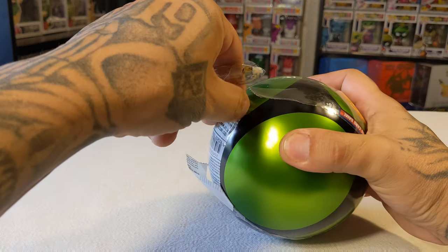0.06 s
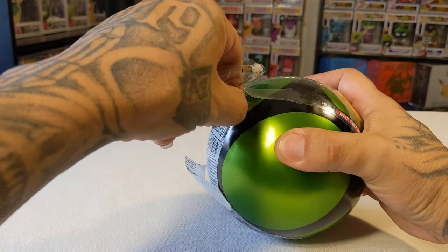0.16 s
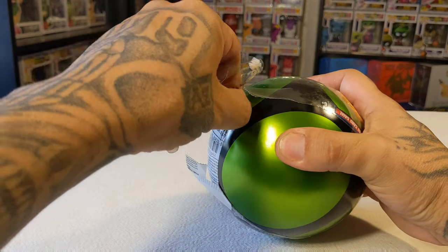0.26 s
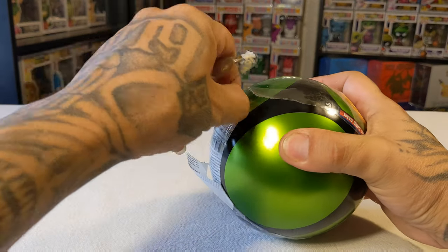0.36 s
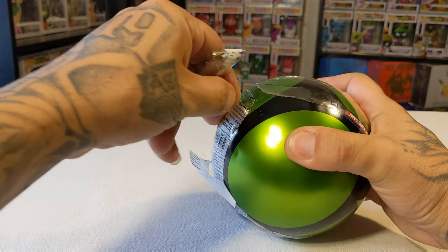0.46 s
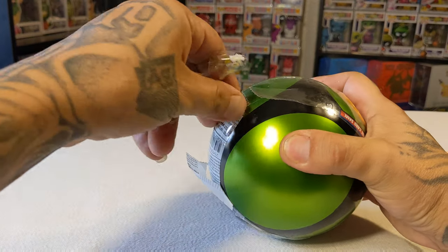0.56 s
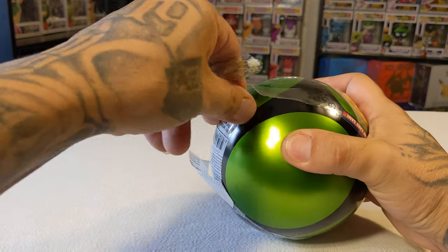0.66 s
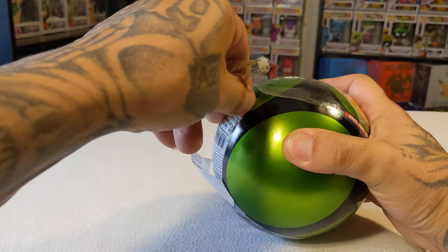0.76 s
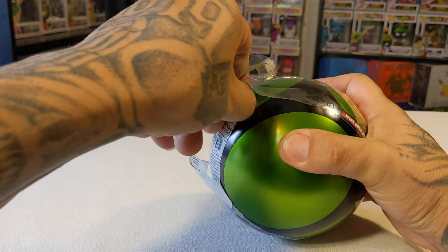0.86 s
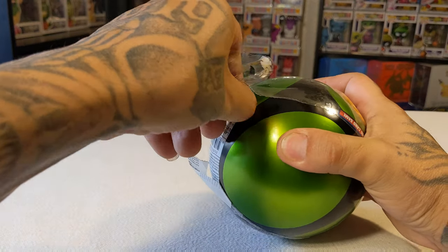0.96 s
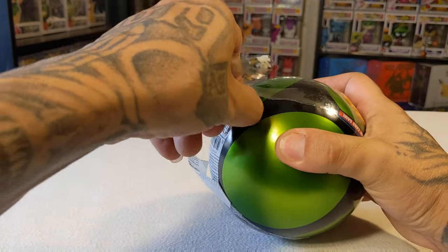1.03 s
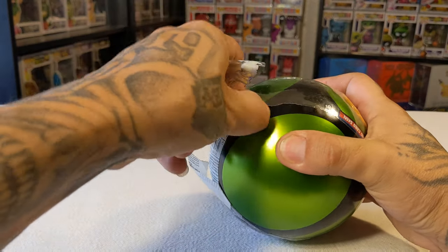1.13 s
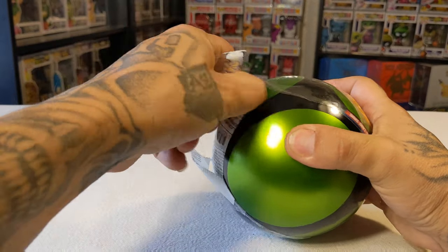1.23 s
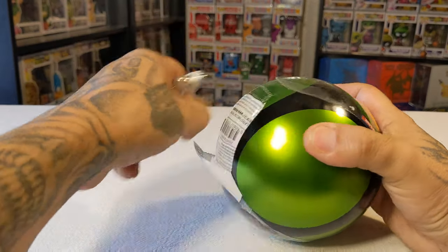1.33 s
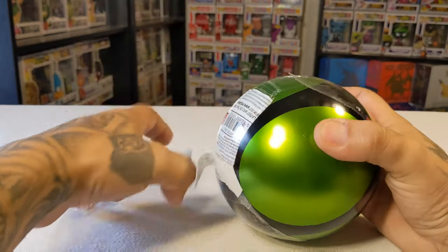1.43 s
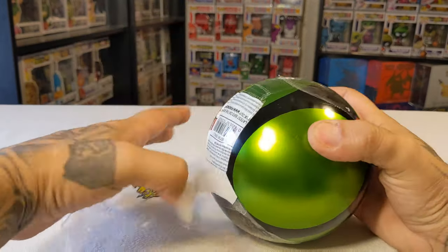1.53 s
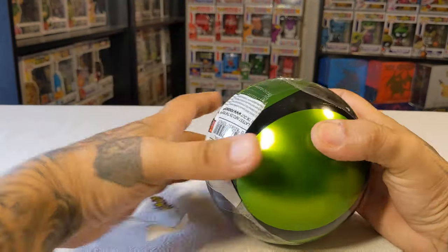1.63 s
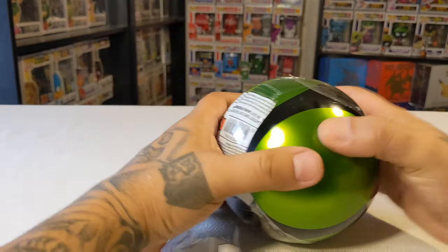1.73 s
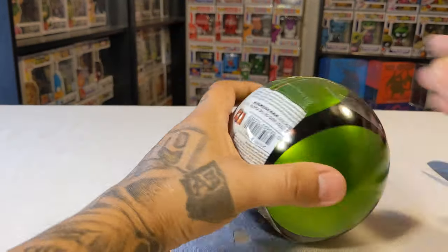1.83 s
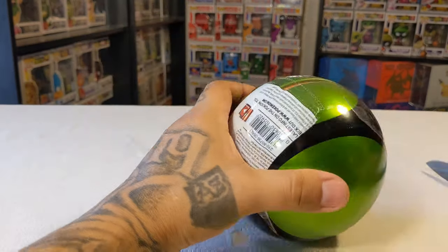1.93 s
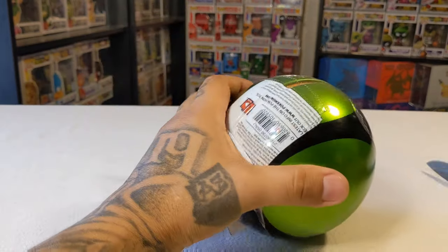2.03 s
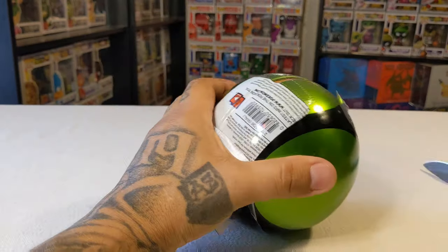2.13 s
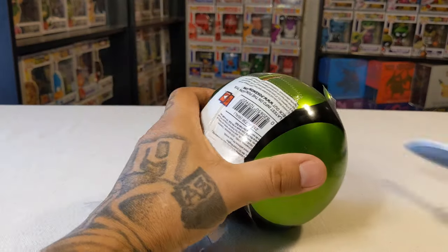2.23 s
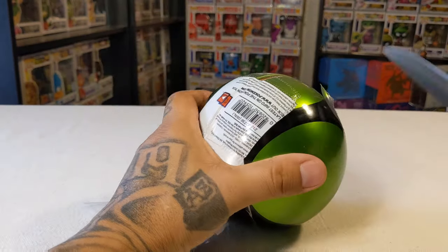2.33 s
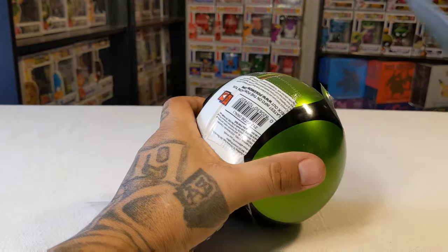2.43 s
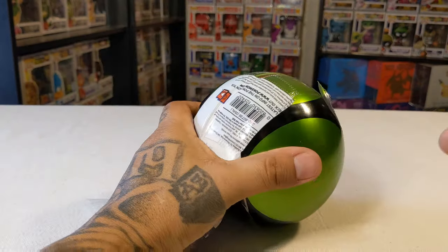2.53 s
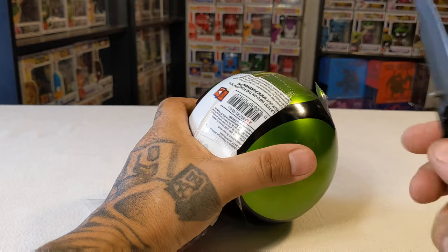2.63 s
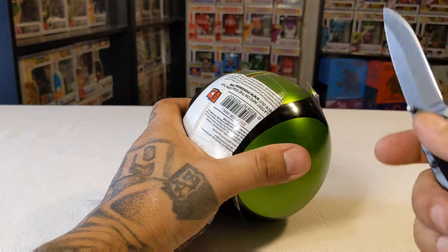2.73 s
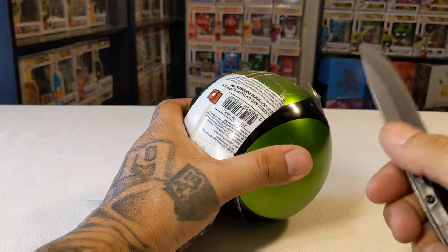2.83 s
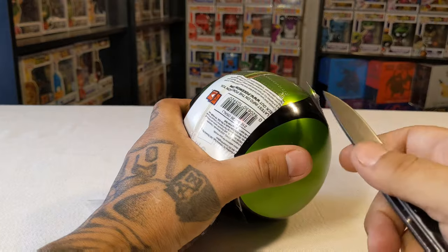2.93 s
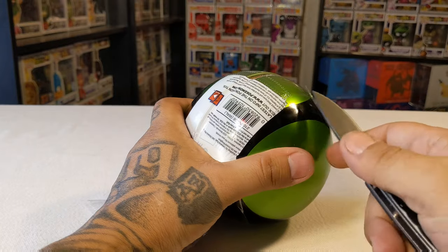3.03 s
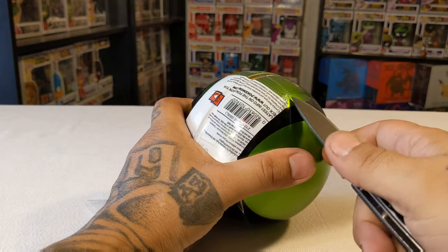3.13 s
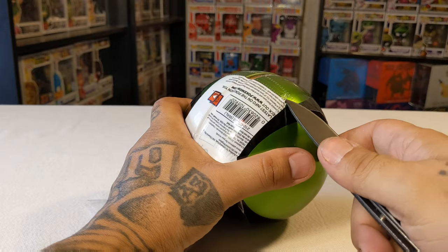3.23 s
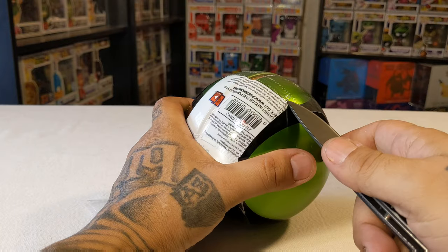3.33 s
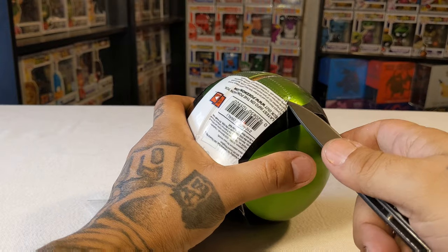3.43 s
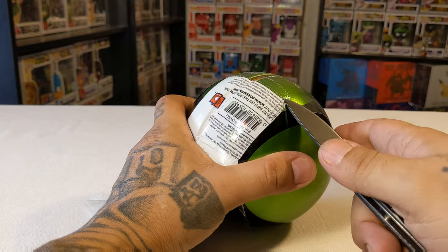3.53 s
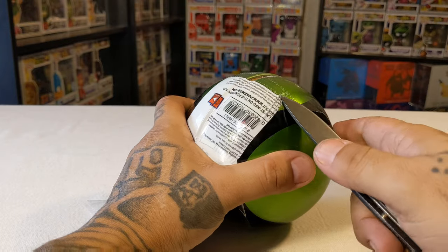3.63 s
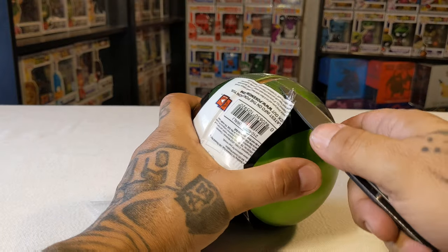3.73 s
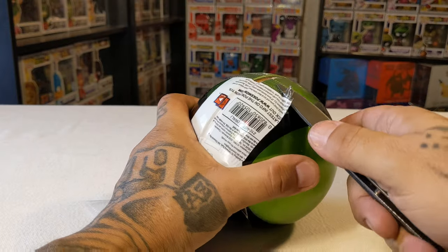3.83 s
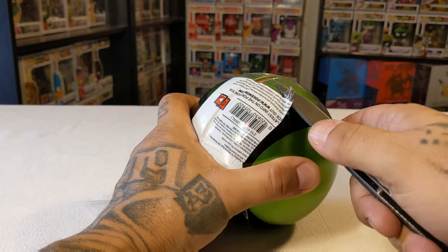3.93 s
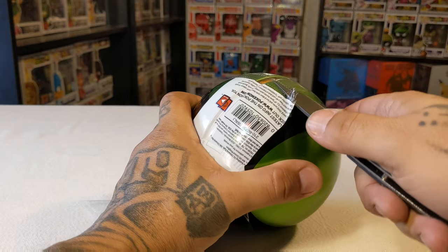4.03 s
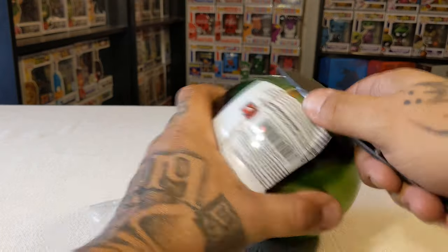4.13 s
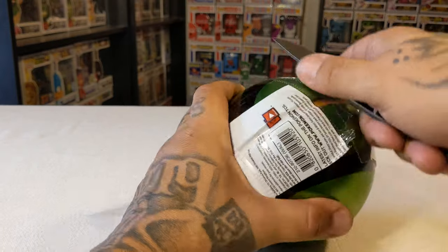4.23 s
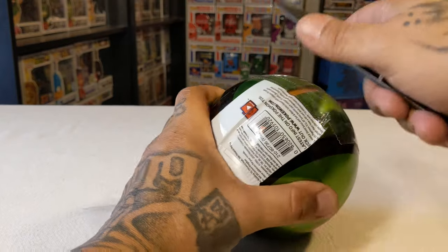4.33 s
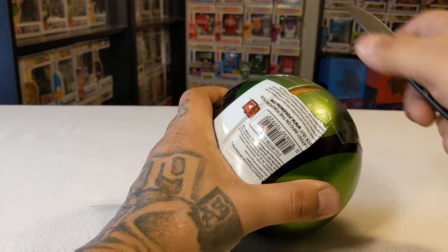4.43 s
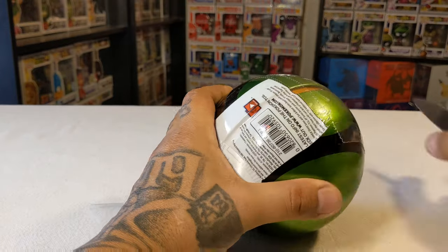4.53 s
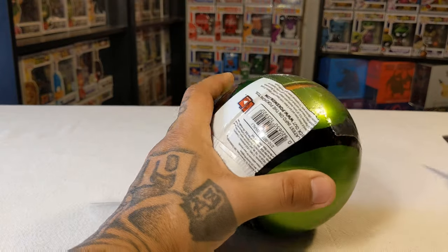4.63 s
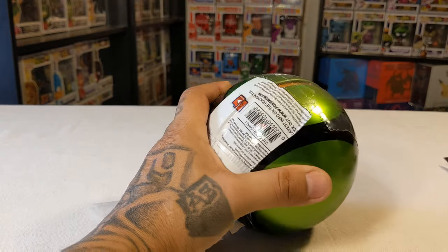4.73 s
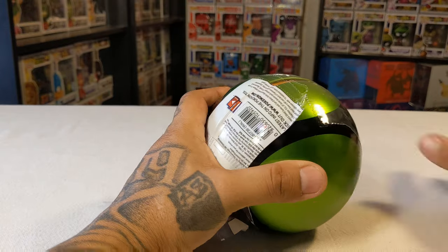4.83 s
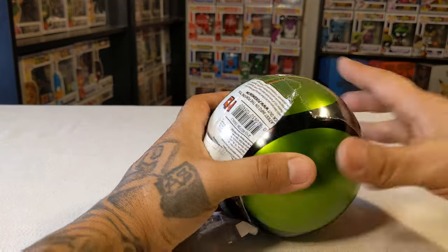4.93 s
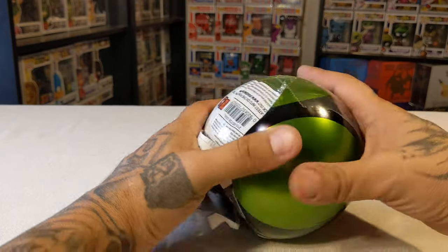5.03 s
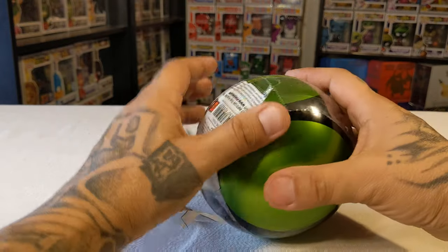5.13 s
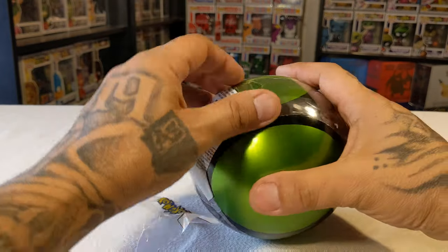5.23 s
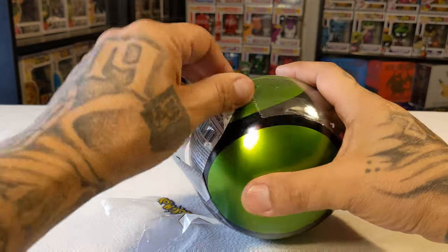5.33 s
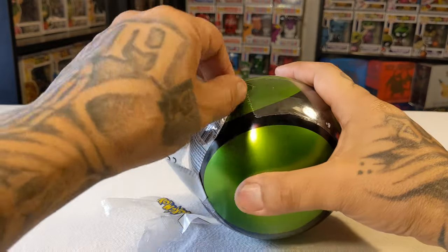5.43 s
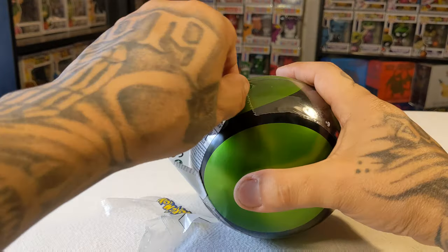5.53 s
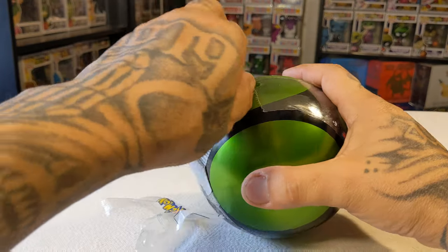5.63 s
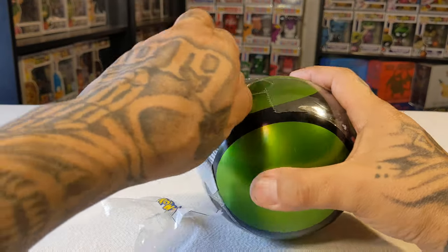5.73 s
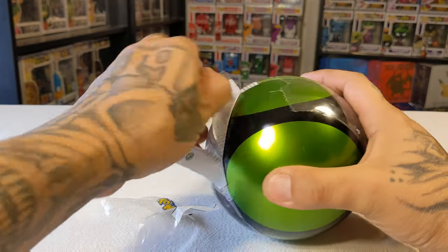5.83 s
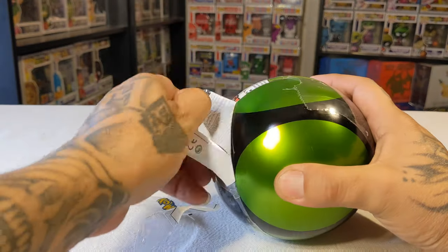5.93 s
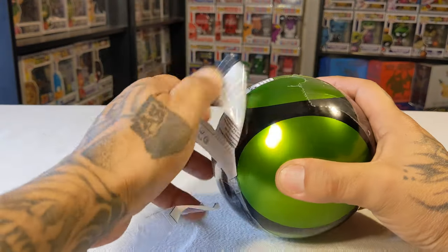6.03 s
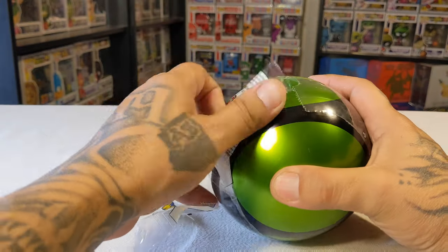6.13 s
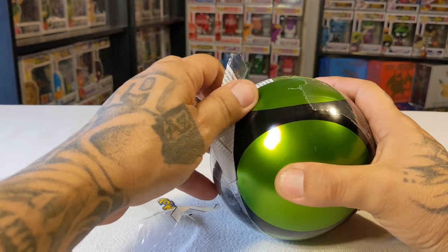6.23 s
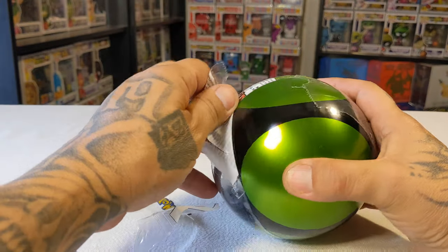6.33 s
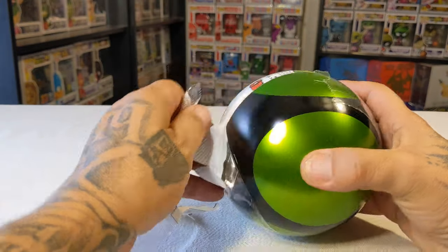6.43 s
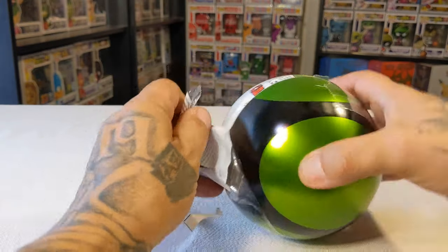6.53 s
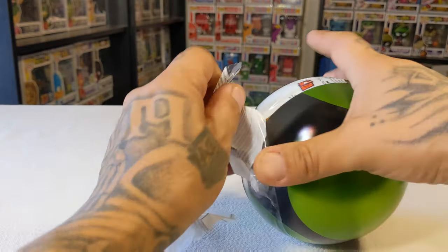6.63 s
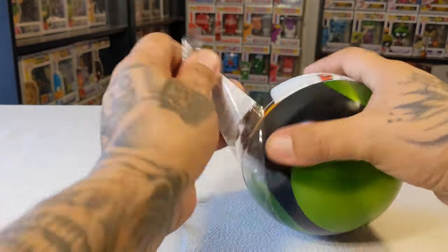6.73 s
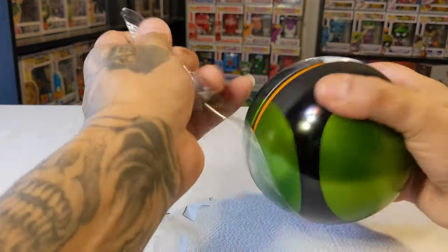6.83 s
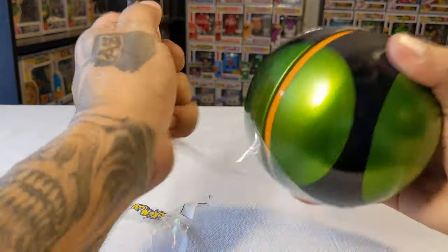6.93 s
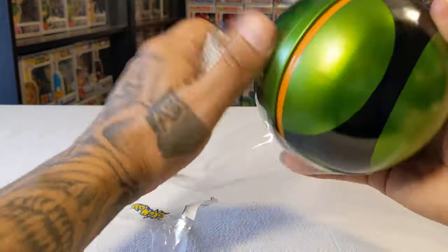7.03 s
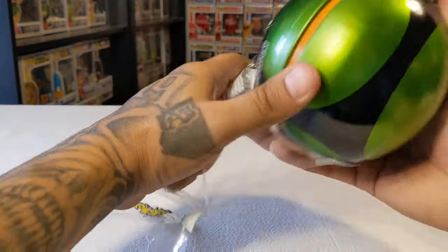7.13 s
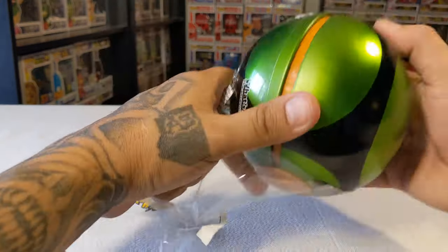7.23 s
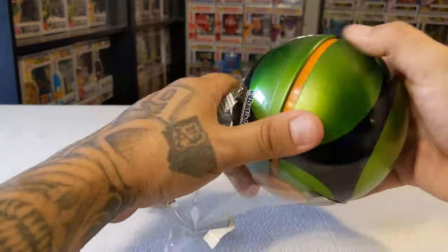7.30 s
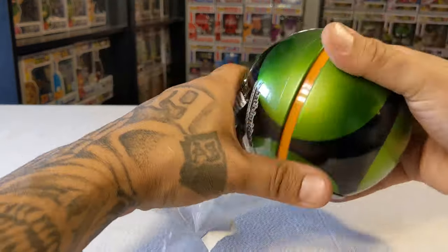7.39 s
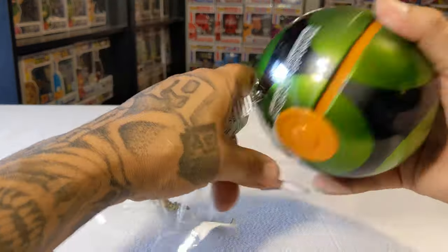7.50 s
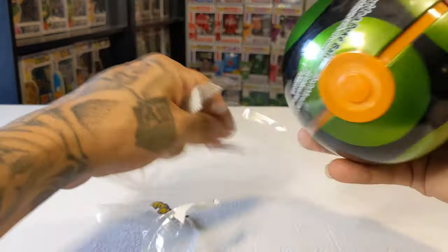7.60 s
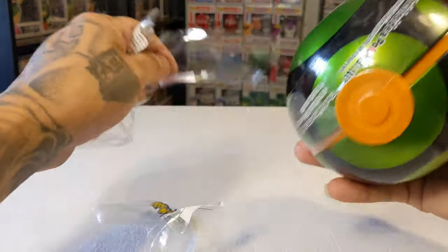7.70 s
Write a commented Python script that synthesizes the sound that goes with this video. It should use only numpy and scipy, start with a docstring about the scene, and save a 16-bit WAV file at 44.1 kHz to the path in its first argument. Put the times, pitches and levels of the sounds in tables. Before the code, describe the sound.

Plastic shrink-wrap crackles and snaps as it is peeled off a round metal tin, pausing midway, then torn away in loud bursts, with table thuds.

```python
"""Shrink-wrap torn off a tin

Hands tear and peel shrink-wrap off a round metal tin on a table in a small room, close to two unlike microphones.
Creases of film snap as shaped noise bursts over crinkle and rustle made of tiny grains; midway a knife nicks
the film, heard through the same snaps. Decaying modes make the tin's bumps on the table and its shell's rattles.
Room reflections, low rumble, hiss and one brief thin tone lie around it."""
import sys
import numpy as np
from scipy import signal
from scipy.fft import rfft, irfft, next_fast_len
from scipy.io import wavfile
from scipy.ndimage import uniform_filter1d

SR = 44100
rng = np.random.default_rng(int(sys.argv[2]) if len(sys.argv) > 2 else 0)


def generate_wav(signal):
    """Clip the signal to [-1, 1] and save it as 16-bit WAV at the path in sys.argv[1]."""
    frames = np.transpose(np.atleast_2d(signal))
    scaled = np.clip(frames, -1, 1) * 32767
    pcm = np.round(scaled).astype(np.int16)
    wavfile.write(sys.argv[1], SR, pcm)


N = 342171
TIME = np.arange(N) / SR
EDGE_HZ = 15950  # upper limit of the sound

# the loud snaps of the film: [t/s, relative level/dB, slope/dB per octave, main resonance of the crease f/Hz,
# length/ms, left over right before the microphones/dB]
LOUD_SNAPS = [(0.052, -27, 1, 3660, 1.4, 6), (0.1094, -4, -2.5, 3670, 2.1, 7.5),
              (0.1342, -9, -2, 660, 1.9, -3), (0.279, -23, 0.5, 3180, 6.8, 4),
              (0.377, -13.5, -3.5, 2880, 6, 6), (0.424, -14.5, -7.5, 5300, 1.6, 2.5),
              (0.462, -11.5, -4.5, 800, 2.3, -7), (0.4784, 3, -2.5, 12200, 1.2, -0.5),
              (0.63, -13.5, -3, 2880, 2.5, -2), (0.652, -1, 1.2, 4300, 2, 5),
              (0.657, -7.5, -1.2, 5400, 1.5, 10), (0.8672, -15, -3.0, 8200, 0.9, -4),
              (0.896, 2, 6, 2920, 0.37, 2.5), (1.016, -22.5, -0.5, 6900, 1.4, 11),
              (1.092, -20.5, 0.5, 4100.0, 5.7, 7.5), (1.2044, -10, 0.5, 3500, 4, -0.5),
              (1.2386, -9, 1, 4000, 0.67, 5), (1.2648, -7, 0.5, 3280, 4.4, -3),
              (1.2726, -13, -3, 3970, 3.4, 4), (1.326, -11.5, 1, 5600.0, 4, -4),
              (1.397, 5, 2, 1010, 2.1, -6.5), (1.428, -18, 6, 13400, 2.8, 0),
              (1.498, -9, -2, 8200, 2.8, -3), (1.544, -3, 1, 950.0, 7.7, -4),
              (1.57, -1.5, 0.4, 5300.0, 5.1, -3), (1.592, -5.5, -1.5, 8500, 1.1, 3),
              (1.752, -13.5, -0.5, 3980, 6.4, -5), (1.7788, 0, 4.5, 1000.0, 4, -4),
              (1.811, -14.5, 2.5, 9700.0, 3.8, -4), (1.8588, -1.5, 4, 1270, 2.9, 3),
              (1.9029, -16.5, -3.9, 11000.0, 4.4, 13.5), (2.0251, 1, -3.2, 2150, 0.73, 3.5),
              (2.0396, -12, -1, 14300, 12, -17), (2.1117, -9, 3, 1300, 5.6, -9),
              (2.164, -14.5, -6.5, 1150, 3.9, -1), (2.4386, -17, -3.5, 1410, 8.9, 2),
              (3.2734, -21.5, 2.5, 700.0, 0.54, -1), (3.336, -24.5, -6.5, 2860, 1.8, 4.5),
              (3.821, -5, -1, 14100, 1.2, -6), (3.854, 2, 2.3, 724, 3.2, -1),
              (3.8763, -4, 2.6, 12000.0, 2, -2), (4.1653, -18, -4.5, 13000, 4.4, 0),
              (4.193, -7.5, -2.1, 12900, 2, -5), (4.201, -8.5, -4.5, 13500, 2, -3),
              (4.2118, -5.5, 0.7, 12900, 2.2, -1.5), (4.2473, -6, 1, 12000.0, 0.94, -3),
              (4.266, 9, -3.0, 11500, 2.1, -2.5), (4.325, -8, 3, 1400.0, 3.3, -7),
              (4.3631, 0, -3, 13900, 2.4, 2.5), (4.5494, -5, -2, 1480, 2.3, 7.5),
              (4.6411, -21, -3, 1500.0, 2.2, 15), (4.7604, -32, -8, 1270, 2.1, -2),
              (4.99, -16, -4.5, 2060, 3.1, 4), (5.0464, -12.5, 2.5, 1600.0, 2.7, -5),
              (5.1671, -12, -3, 11000.0, 7.5, 1), (5.2522, -11, -3.5, 636, 2.2, -1),
              (5.2723, 0, 0.7, 11100, 3.5, -3.5), (5.3216, -16.5, -0.1, 9650, 0.73, 1),
              (5.4604, -13.5, -0.5, 12200, 7.6, -8), (5.4854, -14, -1.5, 13600, 3.1, 0),
              (5.5975, -13, 2, 2010, 1.5, 0), (5.7299, 0.5, 2.5, 785, 5.5, 0),
              (5.7365, -1, 5, 895, 2.6, -3), (5.765, -9.5, 2.3, 9700.0, 1.2, -3),
              (5.8279, -6, 4, 13200, 1.2, -1.5), (5.855, -10, 0.5, 6700.0, 1.7, -1),
              (5.875, -13.5, 3.5, 5600.0, 2.8, 5), (5.911, -4, 3.5, 3860, 1.2, -0.5),
              (5.921, -6, -1.5, 7200, 1.7, 3), (5.956, -5.5, -2, 1350, 1.3, 2),
              (6.0276, 2, 2, 2470, 2, 0.5), (6.0434, -4, -1, 2500, 0.89, -6),
              (6.0524, -2, -5, 7460, 4, 3.5), (6.0783, -7.5, -4.5, 7600.0, 3.9, 13),
              (6.1975, -9, 3.5, 2000.0, 2.2, 0), (6.211, -0.5, 4, 3030, 1.5, -2.5),
              (6.3139, 3, -0.7, 9200, 1, -2), (6.3389, -2.5, 0.7, 8100.0, 2.6, -6),
              (6.3462, 0.5, 3.5, 1500.0, 2.5, 1), (6.395, 2.5, 0.7, 8600.0, 5.3, -1),
              (6.4244, -7.5, 4, 7450, 1.6, 2), (6.4746, -5, 2.7, 8500, 2.3, -1.5),
              (6.5239, -2.5, 3.5, 1930, 6.8, -2), (6.544, -3.5, 1.5, 1800, 3.5, -1),
              (6.593, 7, 3, 1350, 2.5, 0.5), (6.652, 2.5, -4, 12300, 2.9, -1),
              (6.715, -10.5, 3.7, 14100, 17, -7), (6.7338, -1, -1.5, 1900.0, 0.58, 6),
              (6.8264, 0.5, -1.2, 6660, 1.6, 0), (6.8798, -8, 4.5, 5930, 2.4, 2),
              (6.8873, 6, 2.5, 690, 2.2, 1), (6.9019, 3, -3, 5100, 3.1, -3),
              (6.9342, 11.5, -1.1, 2010, 2.6, -5), (6.9768, -0.5, 1.7, 2200.0, 2, -12),
              (7.02, -3.5, -4.4, 3180, 1, -4), (7.0307, -2, -2, 1970, 2.3, 2),
              (7.0682, 9.5, 1, 1600.0, 3.3, -1.5), (7.0795, 5.5, -2.5, 8100.0, 2.6, -2),
              (7.1072, 9.5, 1.3, 870, 6.4, -2), (7.1209, 5, -3.5, 5170, 3.8, -4),
              (7.1555, 0, 3.5, 2060, 1.9, 7), (7.181, -9, 7, 4940, 1.8, 4),
              (7.2304, -0.5, 0.5, 3250, 2.9, 6), (7.3137, 7, 2.9, 800, 1.3, 1),
              (7.3257, 5.5, -3.5, 12100, 3.3, 2), (7.377, -6, -2.5, 5050, 2.1, 17.5),
              (7.391, -8, -5, 2600, 3.8, 1), (7.4503, -1.5, -1.7, 1520, 2.3, -4),
              (7.571, -6, -3, 1780, 2.4, 3), (7.5842, 5, 2, 1800.0, 1.4, 2),
              (7.5892, 8, 0.6, 2080, 0.79, 1.5), (7.6155, -1.5, 0.5, 1900, 2.5, 2),
              (7.655, 8.5, -4, 9700.0, 2.2, -2), (7.724, 8, 1.6, 1570, 2.3, 3.5),
              (7.7503, 10.5, -2.5, 10800, 0.74, -5.5)]


def amp(db):
    """Decibels to gain."""
    return 10 ** (np.asarray(db) / 20)


def unit(x):
    """Scales to rms 1."""
    return x / np.sqrt(np.mean(x ** 2) + 1e-20)


def read(points, hz):
    """Reads a table on a log-frequency axis."""
    f, value = np.transpose(points)
    return np.interp(np.log(hz + 1), np.log(f + 1), value)


def add(mix, s, sound):
    """Mixes a sound in at time s."""
    part = mix[..., max(round(s * SR), 0):][..., :sound.shape[-1]]
    part += sound[..., :part.shape[-1]]


def causal(db):
    """Minimum-phase response for a gain curve: a sharp front, the ringing after it."""
    log_gain = np.log(amp(np.concatenate([db, db[-2:0:-1]])))
    return np.exp(np.conj(signal.hilbert(log_gain)))[:len(db)]


def colour(x, points, size=4096):
    """Filters by a spectrum table, in minimum phase."""
    taps = irfft(causal(read(points, np.fft.rfftfreq(size, 1 / SR))))
    taps = taps.reshape((1,) * (x.ndim - 1) + (-1,))
    return signal.oaconvolve(x, taps, axes=-1)[..., :x.shape[-1]]


def pair(x, lead_ms=0.07):
    """Two unrelated signals become a microphone pair: most alike low down, the right a little early."""
    # likeness of the two channels: [f/Hz, share in common/0-1]
    likeness = [(60, 0.3), (150, 1), (500, 0.87), (1200, 0.72), (3000, 0), (14000, 0)]
    hz = np.fft.rfftfreq(x.shape[1], 1 / SR)
    right, other = rfft(x)
    same = np.clip(read(likeness, hz), 0, 1)
    left = same * right + np.sqrt(1 - same ** 2) * other
    left = left * np.exp(-2j * np.pi * hz * lead_ms / 10 ** 3)
    return irfft(np.array([left, right]), x.shape[1])


def ambience(level_db=-50.5, hiss_hz=4000):
    """Low rumble of the house and faint hiss; the hiss swells, drops for a while and returns."""
    # spectrum of the still room, scaled afterwards to level_db: [f/Hz, relative level/dB]
    still_room = [(20, -40), (36, -20), (58, -1), (95, -2), (125, 0.5), (220, -4.5), (400, -15),
                  (650, -18.5), (1100, -27.5), (1900, -25.5), (3200, -33), (9000, -48), (12500, -37.5),
                  (14600, -34.5)]
    # gain of the treble above hiss_hz: [t/s, level/dB]
    hiss_gain = [(0, 6), (2.6, 5), (3.05, 10.5), (3.13, 3), (3.7, 4), (3.9, 9), (7.76, 7)]
    noise = pair(rng.standard_normal((2, next_fast_len(N))))[:, :N]
    air = amp(level_db) * unit(colour(noise, still_room))
    high_pass = signal.butter(2, hiss_hz, "high", fs=SR, output="sos")
    hiss = signal.sosfiltfilt(high_pass, air)
    extra = amp(np.interp(TIME, *np.transpose(hiss_gain))) - 1
    return (air + hiss * extra) * amp([[1.0], [-1.0]])  # the left 2 dB above the right


def crease(hz, tilt_db, crease_hz):
    """Spectrum of a snap in dB: one broad resonance set by the crease's size, on a slope set by its sharpness."""
    # spectrum that all snaps share: [f/Hz, level/dB]
    shared_colour = [(630, -3), (1100, -5), (2000, -2.8), (4000, -0.5), (6300, -0.8), (8500, -4),
                     (11000, -2), (13700, 0.6)]
    peak_db, half_width_octaves = 12, 0.63
    pivot_hz, lowest_hz = 4000, 620
    held = np.maximum(hz, lowest_hz)
    resonance = peak_db / (1 + (np.log2(held / crease_hz) / half_width_octaves) ** 2)
    slope = tilt_db * np.log2(held / pivot_hz)
    bass_loss = 10 * np.log10(1 + (260 / (hz + 20)) ** 4)
    return read(shared_colour, hz) + slope + resonance - bass_loss


def facet(hz, count=26):
    """Each facet of film has a size of its own, and so its own broad resonances, in dB."""
    knots_hz = np.geomspace(850, EDGE_HZ, count)
    knots_db = 2.3 * rng.standard_normal(count) - 0.4
    return read(list(zip(knots_hz, knots_db)), hz)


def snap_envelope(t, length_ms):
    """A faint noise swells before time 0, then the crease snaps over and flutters out."""
    rise, ring = 0.22, 0.72  # time constants as shares of length_ms
    lead_in_db, lead_in_ms = -20, 4.7
    flutter_db, flutter_ms = -22, 7.0
    ms = abs(t) * 10 ** 3
    u = ms * (t > 0) / max(length_ms, 0.3)
    flip = np.exp(-u / ring) * (1 - np.exp(-u / rise))
    lead_in = amp(lead_in_db) * np.exp(-ms / lead_in_ms)
    flutter = amp(flutter_db) * np.exp(-ms / flutter_ms)
    return flip / flip.max() + np.where(t < 0, lead_in, flutter)


def snaps(rows, size=1536, uneven_db=3.5):
    """A crease gives way in a few quick slips, and its waves scatter through the film.
    Returns what reaches the microphones directly, and what goes out into the room."""
    direct, spread = np.zeros((2, N)), np.zeros((2, N))
    hz = np.fft.rfftfreq(2 * size, 1 / SR)
    t = (np.arange(size) - size // 4) / SR
    for s, db, tilt_db, crease_hz, length_ms, pan_db in rows:
        slips = amp(uneven_db * unit(uniform_filter1d(rng.standard_normal(size), size=24)))
        burst = rng.standard_normal((2, size)) * snap_envelope(t, length_ms) * slips
        z = rfft(pair(burst), 2 * size)
        # flatten the broad spectrum; narrow resonances still differ from crease to crease
        z /= np.sqrt(uniform_filter1d(abs(z) ** 2, size=201, axis=1))
        shape_db = db + crease(hz, tilt_db, crease_hz)
        balance = amp([[pan_db / 2], [-pan_db / 2]])
        add(direct, s + t[0], irfft(z * causal(shape_db + facet(hz))) * balance)
        add(spread, s, irfft(causal(shape_db)))  # summed over all directions, the resonances even out
    return direct, spread


def small_snaps(work_db, count=260):
    """Lesser creases give way at random moments, as strongly as the film is worked; rows as in LOUD_SNAPS."""
    above_db, spread_db = 14, 3.0
    centre_hz, spread_octaves = 3600, 1.02
    tilt_db, length_ms, pan_db = 4.0, 2.2, -1.0  # slope in dB per octave
    rows = []
    for i in rng.integers(0, N, count):
        size, tilt, pitch, length, side = np.clip(rng.standard_normal(5), -2, 2)
        level_db = work_db[i] + above_db + spread_db * size
        crease_hz = centre_hz * 2 ** (spread_octaves * pitch)
        rows.append((i / SR, level_db, tilt_db * tilt, crease_hz, length_ms * 2 ** (length / 2), pan_db * side))
    return rows


def handling():
    """How hard the film is worked: crinkle and rustle levels in dB, raised by each pull and each loud snap."""
    # each pull or squeeze of the film: [start t/s, length/s, fine crinkle level/dB,
    # dull rustle level before its trim/dB]
    pulls = [(0.243, 0.085, -61, -50), (0.344, 0.026, -52, -62), (0.48, 0.11, -56, -44.5),
             (0.781, 0.11, -75, -56.5), (0.879, 0.14, -42, -49), (1.064, 0.17, -51, -48),
             (1.204, 0.07, -44, -52), (1.348, 0.055, -36, -56), (1.395, 0.027, -36, -44),
             (1.513, 0.073, -32, -42.5), (1.61, 0.36, -50, -47.5), (1.991, 0.2, -55, -46),
             (2.244, 0.26, -61, -53.5), (2.56, 0.55, -61, -61), (3.63, 0.21, -70, -61),
             (3.82, 0.017, -44, -30.5), (3.89, 0.073, -45, -72), (4.269, 0.073, -34.5, -32.5),
             (4.587, 0.54, -59, -53), (5.125, 0.14, -44.5, -51), (5.417, 0.055, -36.5, -51),
             (5.728, 0.02, -32.5, -39.5), (5.833, 0.16, -49, -47), (6.049, 0.022, -34, -34),
             (6.172, 0.12, -44.5, -44.5), (6.316, 0.11, -38.5, -48), (6.483, 0.11, -41, -44),
             (6.559, 0.07, -28.5, -52), (6.654, 0.13, -37, -37), (6.854, 0.065, -23, -34.5),
             (6.95, 0.12, -32.5, -35), (7.074, 0.099, -22.5, -33.5), (7.223, 0.032, -31, -43.5),
             (7.305, 0.051, -22.5, -41), (7.456, 0.042, -37.5, -44), (7.554, 0.091, -33, -40),
             (7.677, 0.064, -36, -29.5)]
    attack_s, release_db_per_s = 0.014, 420  # takes hold quickly, dies away once the hand stops
    # every loud snap shakes loose a flurry of smaller creases: crinkle and rustle against the snap
    flurry_db, flurry_db_per_s = (-36.5, -39.5), 597
    power, t = np.zeros((2, N)), TIME[:SR]
    for s, length, *levels_db in pulls:
        release = amp(-release_db_per_s * np.maximum(t - length, 0))
        envelope = np.minimum(t / attack_s, 1) * release
        add(power, s, np.outer(amp(levels_db), envelope) ** 2)
    flurry = np.outer(amp(flurry_db), amp(-flurry_db_per_s * t[:SR // 8]))
    for s, db, *_ in LOUD_SNAPS:
        add(power, s, (amp(db) * flurry) ** 2)
    return 10 * np.log10(power + 1e-12)


def grains(spectrum, level_db, per_s, spread_db, grain_ms, tint_db=6.0, count=28, size=512):
    """Many tiny creases of uneven size, in count colours, as loud as the film is worked."""
    out = np.zeros((2, N))
    u = np.arange(size) / SR * 10 ** 3 / grain_ms
    hz, knots_hz = np.fft.rfftfreq(2 * size, 1 / SR), np.geomspace(620, EDGE_HZ, 10)
    for _ in range(count):
        at = np.flatnonzero(rng.random(N) < per_s / count / SR)
        train = np.zeros((1, N))
        train[0, at] = amp(spread_db * np.minimum(rng.exponential(1, len(at)), 3.0))
        knots_db = tint_db * rng.standard_normal(len(knots_hz))
        tint = causal(read(list(zip(knots_hz, knots_db)), hz))
        grain = rfft(pair(rng.standard_normal((2, size)) * u * np.exp(-u)), 2 * size)
        out += signal.oaconvolve(train, unit(irfft(grain * tint)), axes=1)[:, :N]
    return unit(colour(out, spectrum)) * amp(level_db)


def fine_crinkle(level_db):
    """Short, dense grains of the film, bright in spectrum."""
    # spectrum of the crinkle: [f/Hz, relative level/dB]
    crinkle_colour = [(300, -10), (1200, -28), (2200, -0.5), (4500, 4), (8000, -3), (12000, 0.5),
                      (15500, 4.5)]
    return grains(crinkle_colour, level_db, per_s=700, spread_db=3.0, grain_ms=0.55)


def dull_rustle(level_db, trim_db=-1.5):
    """The sheet as a whole rustles in sparser, darker grains."""
    # spectrum of the rustle: [f/Hz, relative level/dB]
    rustle_colour = [(150, 2.5), (350, 6.5), (650, 4), (950, -2), (1900, -1.5), (3000, -2), (6000, -14.5),
                     (15000, -7.5)]
    return grains(rustle_colour, level_db + trim_db, per_s=500, spread_db=4.0, grain_ms=0.63)


def tail(size=256):
    """Reflections from shelves and walls, each band dying at its own speed."""
    # reverberation of the room: [f/Hz, t60/s]
    room_t60 = [(150, 0.17), (600, 0.48), (2000, 0.33), (5000, 0.42), (9000, 0.38), (15000, 0.22)]
    # level of the reverberation: [f/Hz, level/dB]
    room_level = [(150, -3), (600, -7), (2000, -5), (5000, -10), (9000, -7.5), (15000, -11.5)]
    sparse = rng.standard_normal((2, SR // 2)) * (rng.random(SR // 2) < 0.25)
    hz, t, z = signal.stft(unit(pair(sparse)), SR, nperseg=size)
    t60 = np.maximum(read(room_t60, hz), 0.05)[:, None]
    even_energy = np.sqrt(np.log(10 ** 6) / (t60 * SR))  # long decays are not louder in sum
    z *= amp(read(room_level, hz)[:, None] - 60 * t / t60) * even_energy
    return signal.istft(z, SR, nperseg=size)[1]


def room(x, first_ms=3.7, cycles_per_s=2.3, count=4):
    """Reverberation fades between several independent tails, which keeps its colour even."""
    wet = np.zeros((2, N))
    for k in range(count):
        share = np.maximum(np.cos(2 * np.pi * (cycles_per_s * TIME + k / count)), 0)
        add(wet, first_ms / 10 ** 3, signal.fftconvolve(x * share, tail(), axes=1))
    return wet


def bumps(contact_hz=400, lowest_hz=52, press_ms=1.26, level_db=1):
    """The hand-damped tin thuds on the table; hard contact favours the upper modes, soft contact the low one."""
    # the tin bumps the table: [t/s, level before band-pass and level_db/dB, pitch f/Hz, hardness/dB per octave]
    knocks = [(0.118, -33, 175, -11), (0.277, -30, 178.5, -2), (0.475, -28.5, 175.6, -4),
              (1.399, -25, 182, -10), (1.626, -28.5, 196, 1), (1.946, -28.5, 181, -9),
              (2.113, -19, 207, -4.5), (2.157, -18, 176.5, 2), (3.371, -39, 141, -5),
              (3.763, -24, 157, -11), (3.804, -26, 112, -2), (3.838, -27, 152, 10), (3.886, -29.5, 133, -9),
              (4.196, -33, 170, 10), (4.265, -28, 217, -3), (4.307, -22, 171.4, 12.5),
              (4.333, -21.5, 175, -7), (4.361, -34, 155, -10), (4.435, -31, 175, -8),
              (4.612, -33, 147, 6.5), (4.849, -2.5, 184.2, 1), (4.969, -25, 188, -11),
              (5.02, -18.5, 183, -3.5), (5.052, -29.5, 160, -5), (6.654, -7, 181, -6.5),
              (6.935, -18, 159, -9), (7.016, -33, 167, -3), (7.387, -33.5, 186, -13.5),
              (7.655, -23, 173, 8)]
    # modes of tin and table together: [multiple of the pitch, relative level/dB, t60/s]
    body = [(0.41, -19, 0.13), (0.82, -22, 0.39), (1.0, 0.5, 0.12), (1.22, -12, 0.075), (1.8, -14, 0.11),
            (3.0, -44, 0.1)]
    out, t = np.zeros(N), np.arange(SR // 3) / SR
    press = 1 - np.exp(-(t * 10 ** 3 / press_ms) ** 2)  # the covered table gives a little
    for s, db, hz, hard_db in knocks:
        ring = np.zeros(len(t))
        for k, mode_db, t60 in body:
            decay = amp(mode_db + hard_db * np.log2(k) - 60 * t / t60)
            ring += decay * np.cos(2 * np.pi * k * hz * t)
        add(out, s, amp(db) * ring * press)
    band = signal.butter(3, [lowest_hz, contact_hz], "band", fs=SR, output="sos")
    out = signal.sosfilt(band, out)
    return amp(level_db) * np.array([out, out])


def rattles(uneven_db=2.0, detune_share=0.0099, level_db=-2.5):
    """The tin's shell rattles as it is turned and touched; each touch rings its modes in another proportion."""
    # touches: [t/s, level before level_db/dB]
    touches = [(1.998, -35), (2.024, -37), (2.044, -36), (2.062, -53), (2.112, -35), (2.162, -43),
               (2.185, -39.5), (2.441, -56), (2.489, -54), (2.53, -54), (2.571, -57)]
    # modes of the shell: [centre f/Hz, relative level/dB, t60/s]
    shell = [(1177, 0, 0.19), (1260, 2.5, 0.066), (1670, 4.5, 0.039), (1930, -11, 0.065),
             (2260, -39, 0.078), (3530, 2.5, 0.023), (4540, -14, 0.19)]
    out, t = np.zeros((2, N)), np.arange(SR // 6) / SR
    for s, db in touches:
        for hz, mode_db, t60 in shell:
            size, detune, phase = rng.standard_normal(3)
            turn = 2 * np.pi * hz * (1 + detune_share * detune) * t
            turn = turn + np.array([[0], [phase]])  # the channels differ in phase
            decay = amp(db + mode_db + uneven_db * size - 60 * t / t60)
            add(out, s, decay * np.sin(turn))
    return amp(level_db) * out


def tone(centre_hz=1060, waver=0.0052):
    """A faint thin tone sounds for a moment and wavers a little in pitch."""
    # loudness of the tone, silent outside these times: [t/s, level/dB]
    tone_level = [(2.85, -86), (3.0, -68.5), (3.45, -69), (3.65, -89)]
    drift = unit(uniform_filter1d(rng.standard_normal(N), size=1500))
    hz = centre_hz * (1 + waver * drift)
    db = np.interp(TIME, *np.transpose(tone_level), left=-np.inf, right=-np.inf)
    return amp(db) * np.sin(2 * np.pi * np.cumsum(hz) / SR)


def microphones(mix):
    """Each microphone sits behind its own port, which colours what it hears."""
    # colour of the left microphone: [f/Hz, level/dB]
    left_mic = [(100, -1), (700, -3), (1000, -3), (1900, 3), (2600, -1), (4400, 3.5), (7700, 2), (11500, 2),
                (13300, -0.5), (14200, -4), (14680, 4), (15100, -16), (15600, -3.5), (16300, -36)]
    # colour of the right microphone: [f/Hz, level/dB]
    right_mic = [(100, -5), (700, -1.5), (1100, -11), (1900, -6.5), (4200, -10), (6500, -10.5), (9100, -25),
                 (11000, -9), (12800, 2.5), (13850, -11), (14200, 9), (14680, 7.5), (15300, -6.5),
                 (16300, -16.5)]
    return np.array([colour(mix[0], left_mic), colour(mix[1], right_mic)])


def scene():
    """Film and tin in the room, through the two microphone ports, over ambience and tone."""
    # colour of the room's answer to a thud: [f/Hz, level/dB]
    thud_send = [(60, -7), (130, -4.5), (183, -2), (280, -2), (600, -23.5)]
    # nearby surfaces throw the thuds back: [delay t/s, level/dB]
    echoes = [(0.0338, -10.5), (0.0499, -17)]
    fine_db, dull_db = handling()
    direct, spread = snaps(list(LOUD_SNAPS) + small_snaps(np.maximum(fine_db, dull_db)))
    rustling = fine_crinkle(fine_db) + dull_rustle(dull_db) + rattles()
    thuds = bumps()
    mix = direct + rustling + thuds + room(spread + rustling + colour(thuds, thud_send))
    for delay, db in echoes:
        add(mix, delay, amp(db) * thuds)
    return microphones(mix) + ambience() + tone()


def record(dry):
    """Full-scale ceiling, then the band limit."""
    low_pass = signal.firwin(511, EDGE_HZ, window=("kaiser", 9), fs=SR)
    return signal.oaconvolve(np.clip(dry, -1, 1), low_pass[None], "same", axes=1)


dry = scene()
out = record(dry)
generate_wav(out)
```